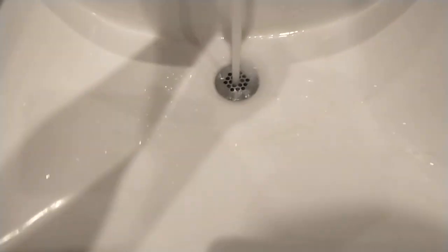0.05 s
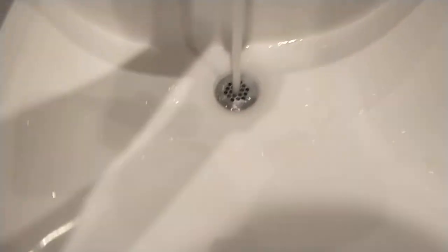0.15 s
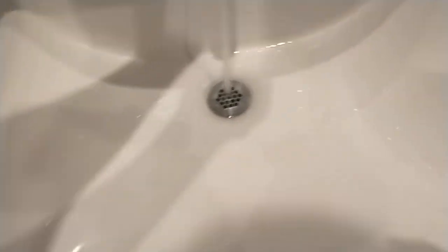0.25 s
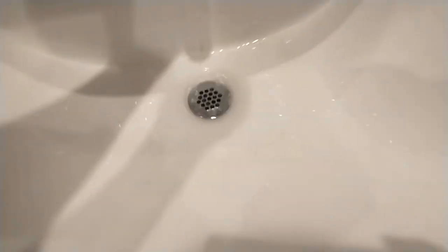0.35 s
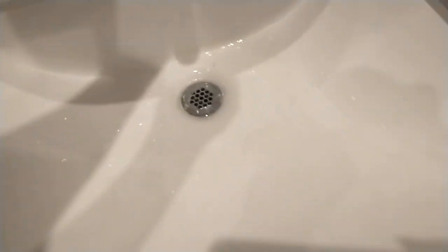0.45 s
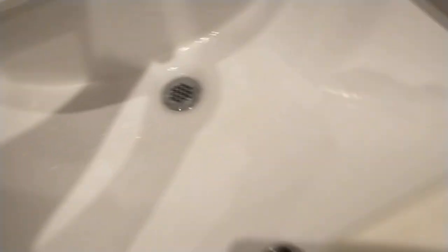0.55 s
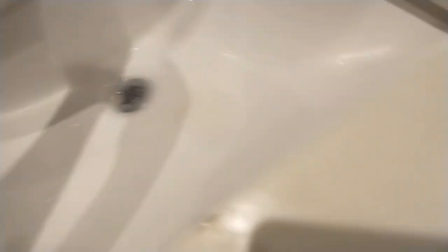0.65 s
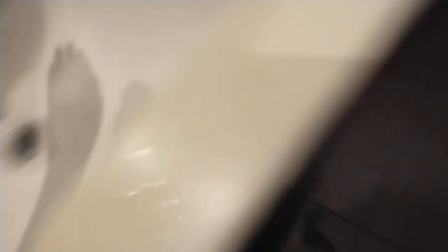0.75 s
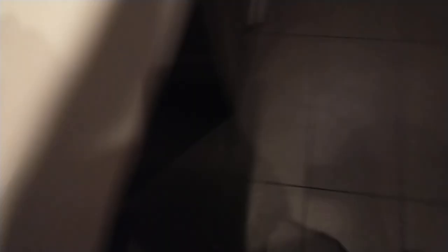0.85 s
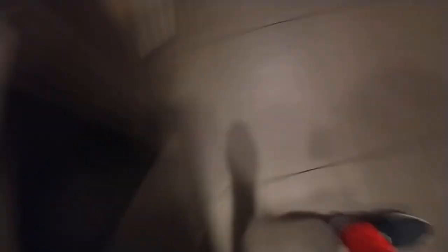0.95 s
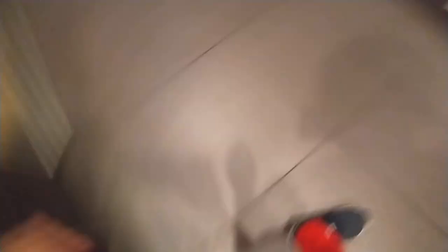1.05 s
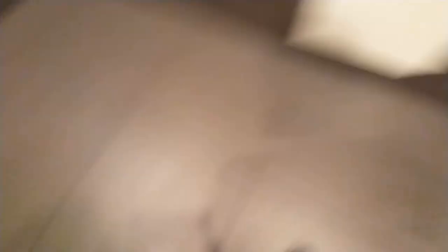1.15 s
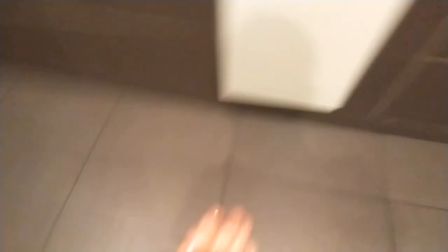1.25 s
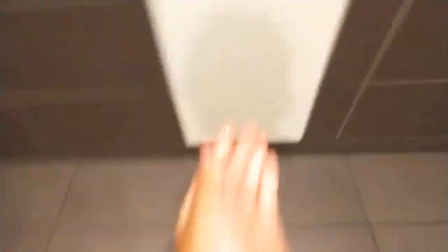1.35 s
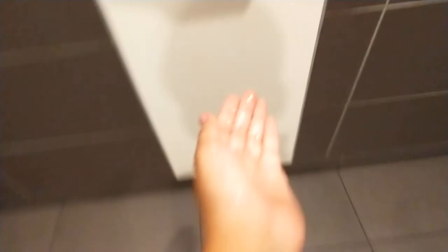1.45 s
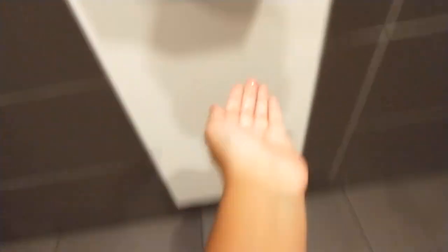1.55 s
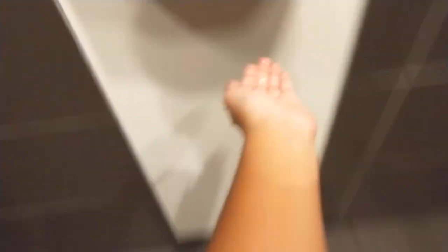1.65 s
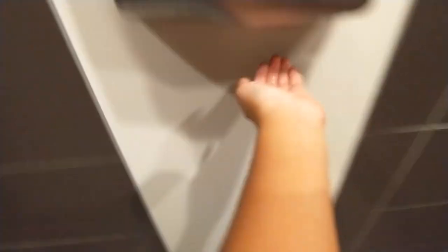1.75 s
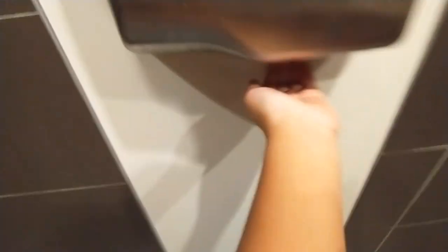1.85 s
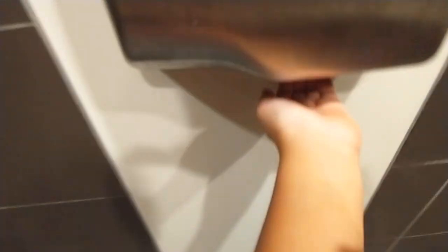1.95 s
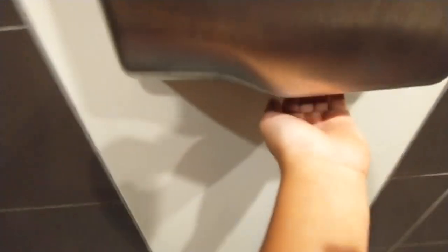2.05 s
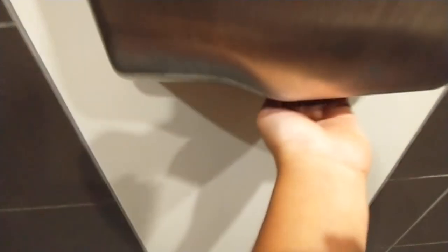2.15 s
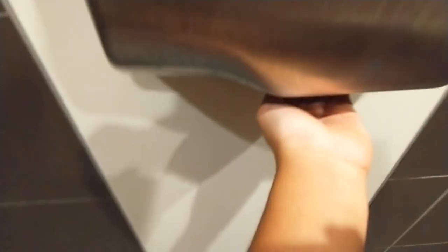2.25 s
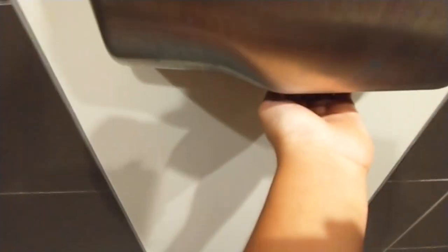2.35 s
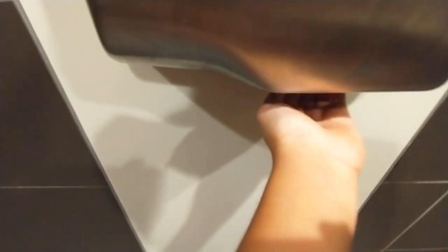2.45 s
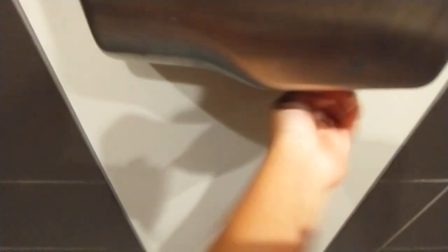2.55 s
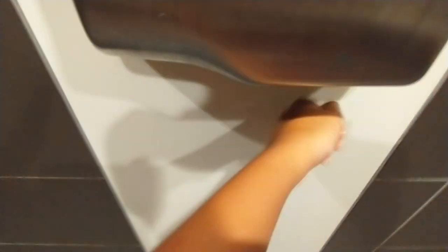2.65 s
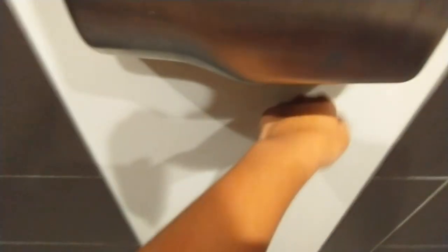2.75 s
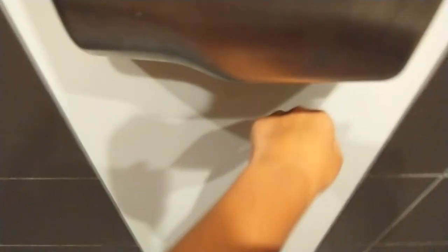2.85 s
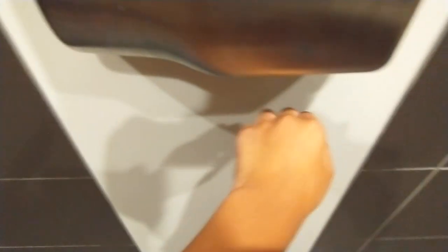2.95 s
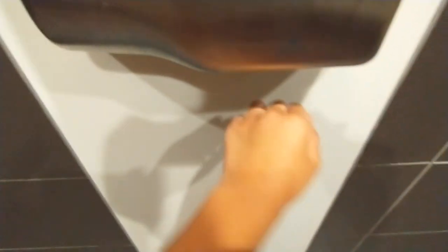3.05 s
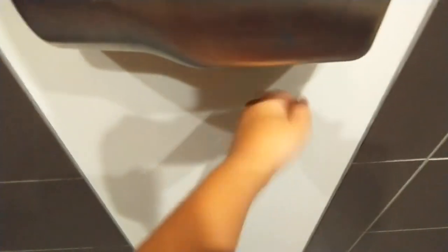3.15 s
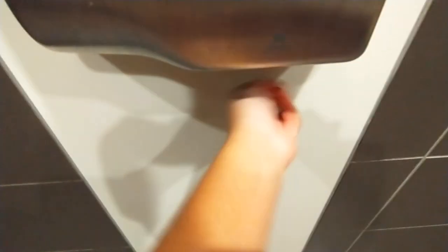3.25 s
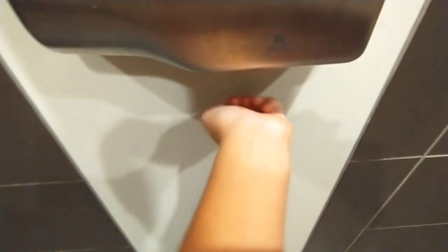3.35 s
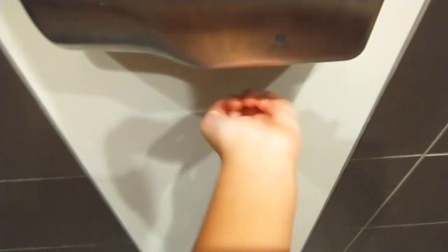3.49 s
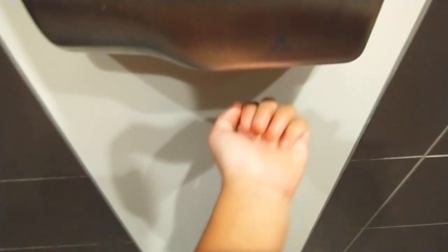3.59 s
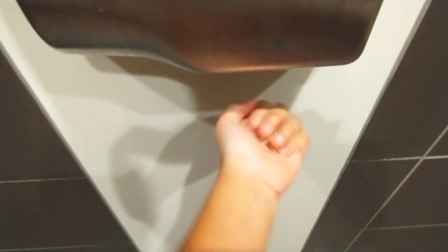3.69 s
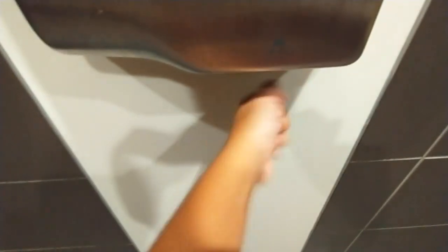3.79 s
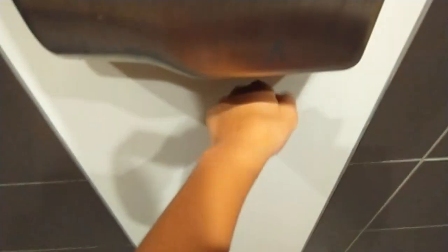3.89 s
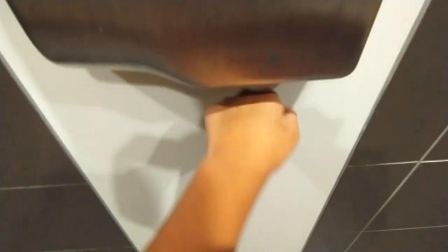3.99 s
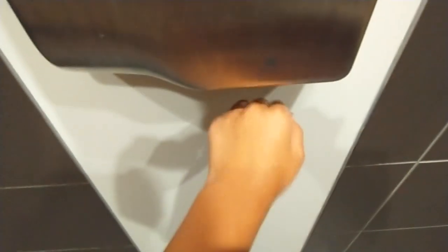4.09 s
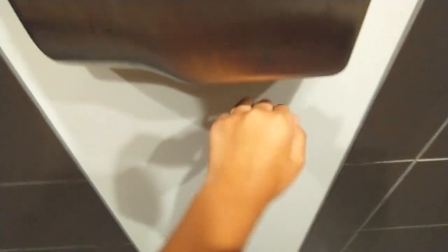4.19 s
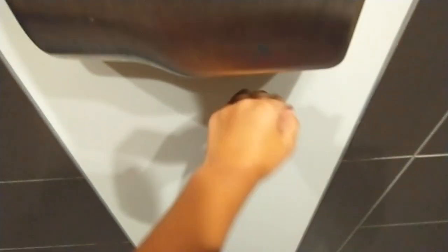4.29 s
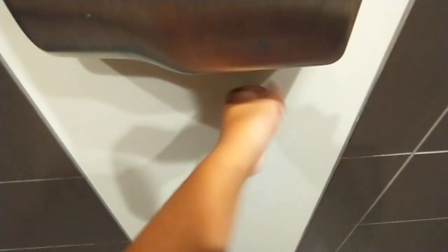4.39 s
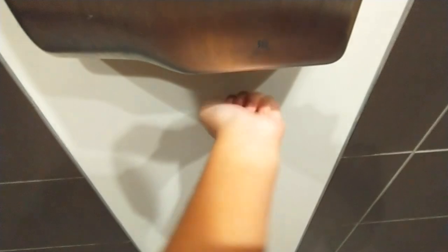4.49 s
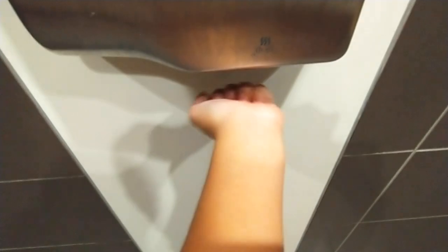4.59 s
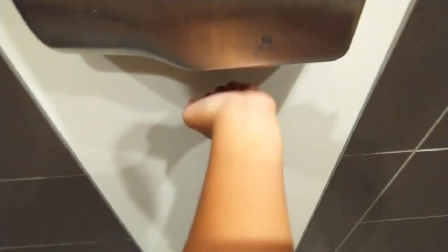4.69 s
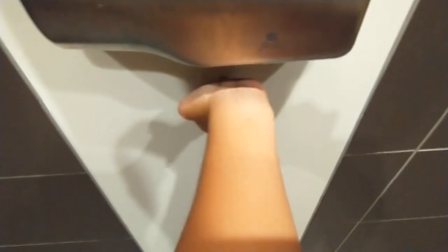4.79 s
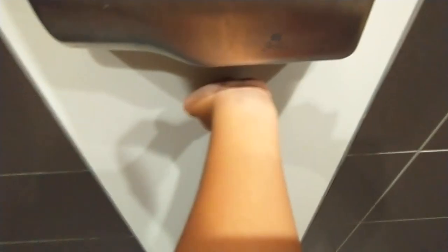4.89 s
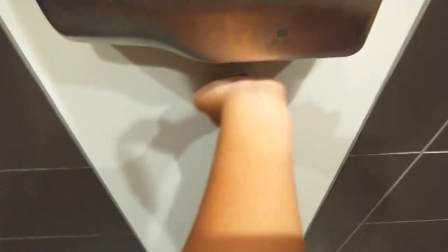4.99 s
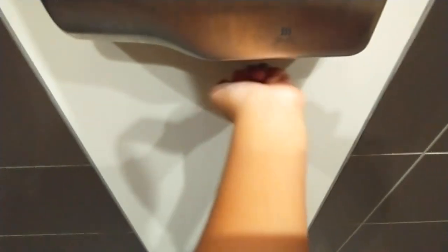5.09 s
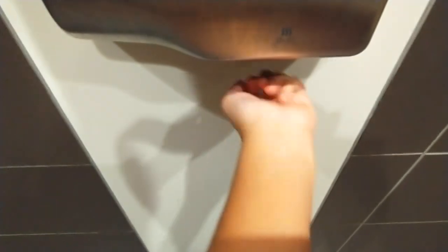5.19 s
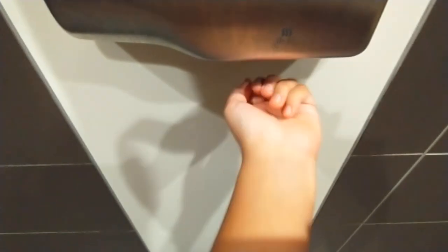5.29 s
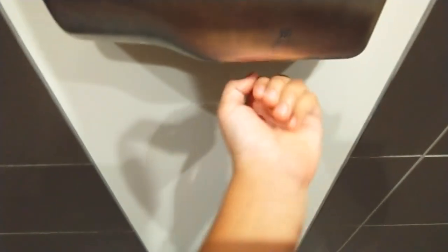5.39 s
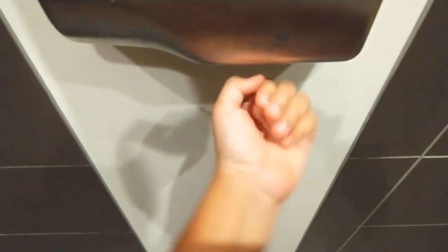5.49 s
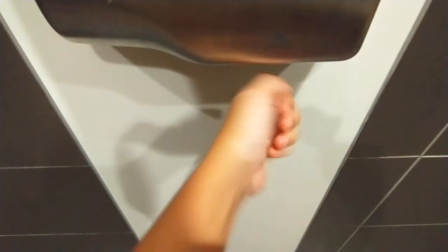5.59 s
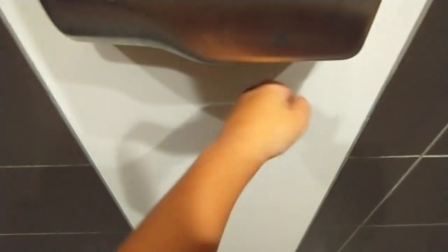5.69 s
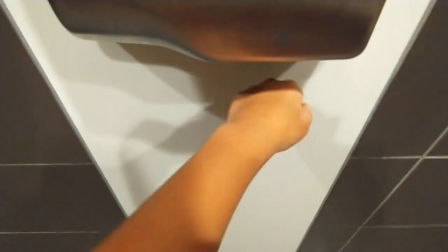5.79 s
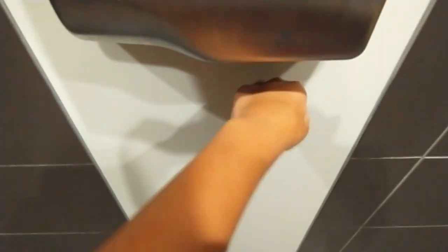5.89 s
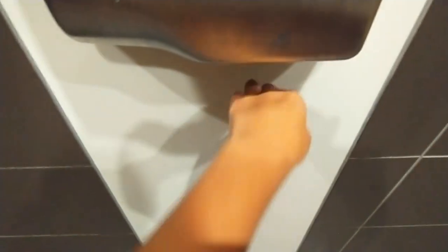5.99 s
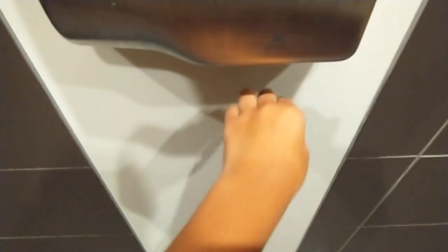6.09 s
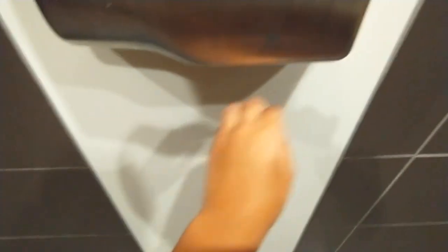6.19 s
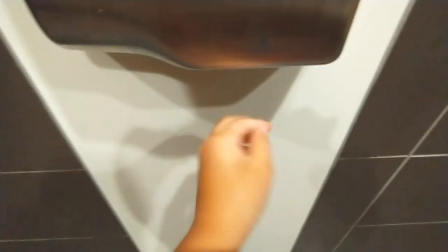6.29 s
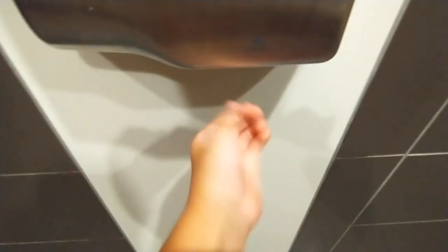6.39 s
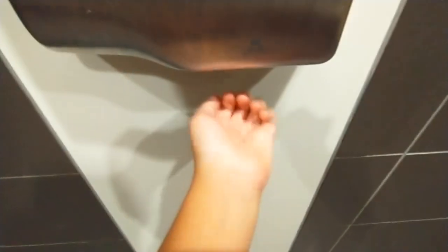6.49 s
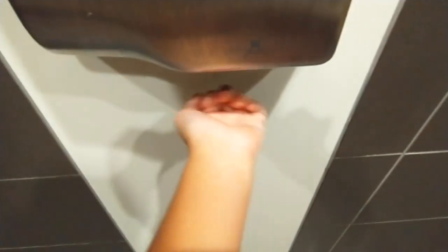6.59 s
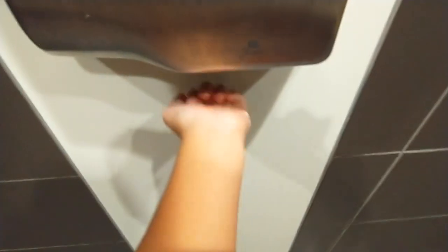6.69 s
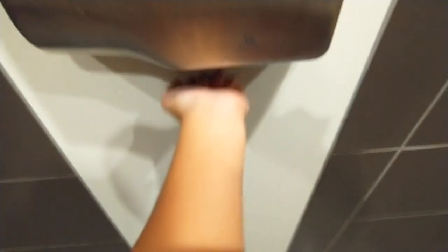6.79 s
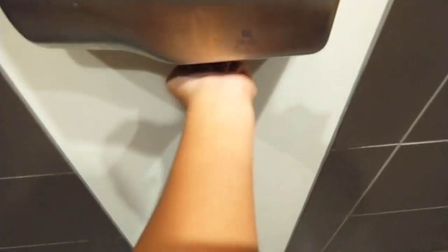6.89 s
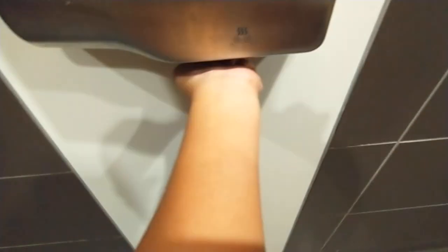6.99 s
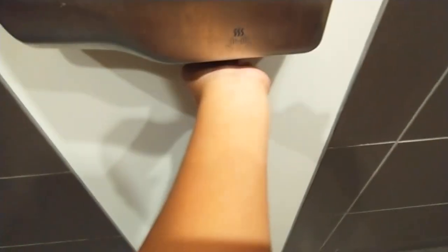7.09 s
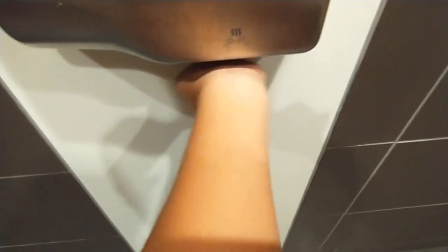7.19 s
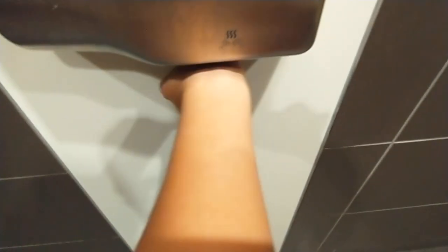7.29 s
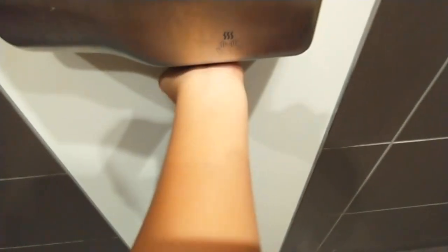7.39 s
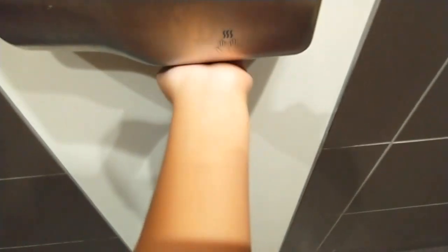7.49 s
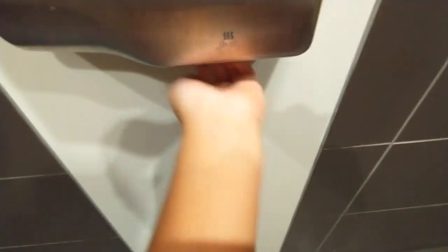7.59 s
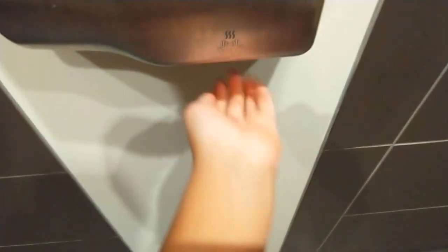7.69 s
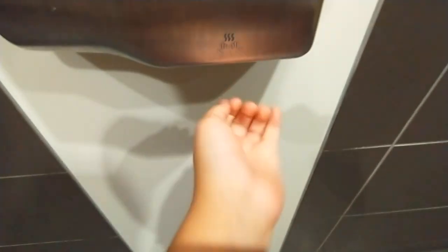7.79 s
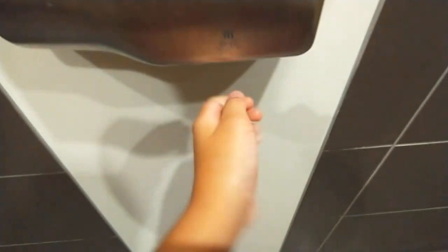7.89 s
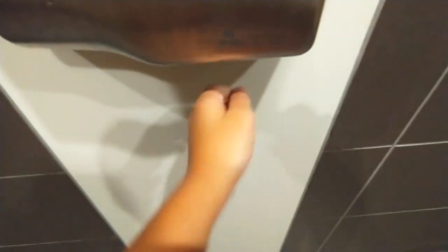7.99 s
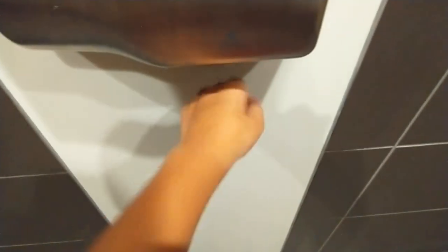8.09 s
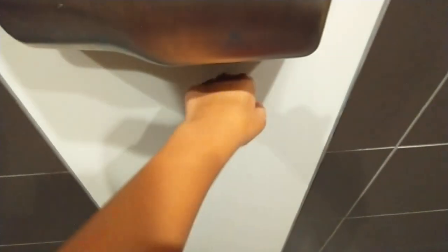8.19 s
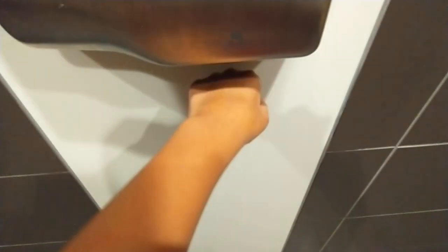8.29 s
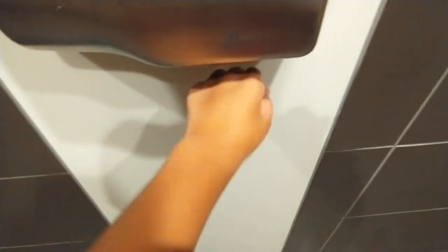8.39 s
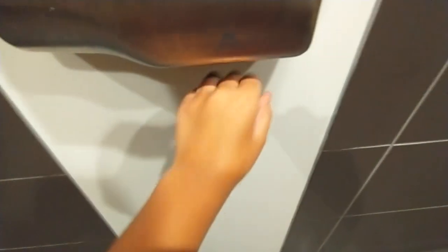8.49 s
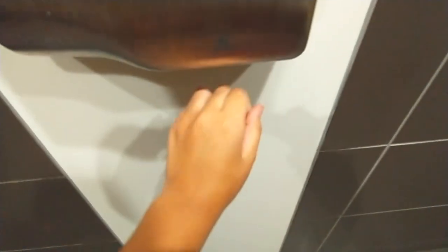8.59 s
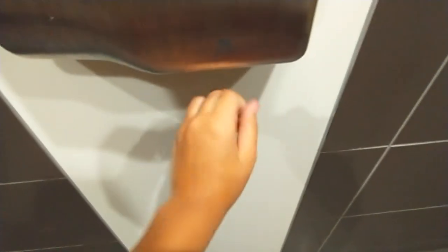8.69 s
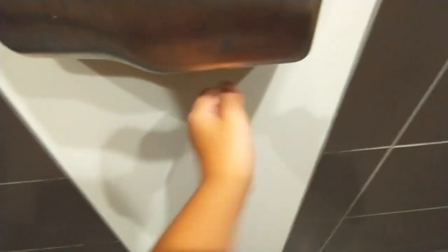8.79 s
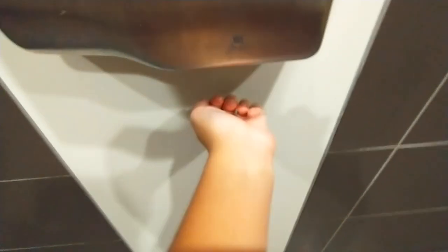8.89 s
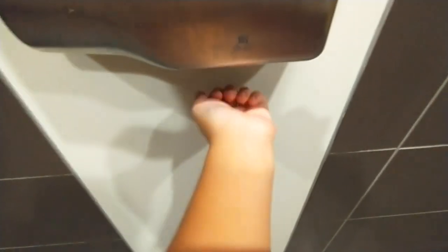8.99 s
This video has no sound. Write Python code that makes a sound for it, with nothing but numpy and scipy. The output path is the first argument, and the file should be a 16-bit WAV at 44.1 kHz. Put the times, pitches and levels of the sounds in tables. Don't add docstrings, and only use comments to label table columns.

```python
import sys
import numpy as np
from scipy import signal
from scipy.fft import rfft, irfft, next_fast_len
from scipy.io import wavfile
from scipy.ndimage import uniform_filter1d

SR = 44100
rng = np.random.default_rng(int(sys.argv[2]) if len(sys.argv) > 2 else 0)


def gain_from_decibels(decibels):
    exponent = np.asarray(decibels, float) / 20
    return 10 ** exponent


def put_to_file(sound):
    columns = np.atleast_2d(sound).T
    safe = np.clip(columns, -1, 1)
    whole_steps = np.round(safe * 32767)
    wavfile.write(sys.argv[1], SR, whole_steps.astype(np.int16))


N = 399105
SIZE, HOP = 1024, 256
HZ = np.fft.rfftfreq(SIZE, 1 / SR)
T = np.arange(N // HOP + 5) * HOP / SR
START_S, TOP_TURNS_PER_S = 2.404, 261.42

# f/Hz, level/dB per Hz
JET_SPECTRUM = [(20, -69), (60, -11.5), (110, -24.5), (200, -17.5), (330, -9), (700, -7.5), (950, -9),
                (1600, -8), (2300, -7.5), (3600, -5), (4400, -5.5), (5600, -7), (6400, -4.5), (8500, -14),
                (13500, -19), (15800, -28.5)]
# f/Hz, correlation/1
JET_SAME = [(60, .4), (130, 0.81), (290, 1), (690, 0.54), (1380, 0.35), (2070, 1), (2760, 0.44),
            (4100, 0.025), (5500, 0.12), (15000, 0.028)]
# f/Hz, left-right/dB
JET_SIDE = [(60, 9), (100, 6), (180, 6.5), (310, 3), (550, 3.5), (950, 6), (1650, 0), (2860, -1.5),
            (4970, -3.5), (8640, 10.5), (11500, -10.5), (15000, 0)]
# t/s, left-right/dB
JET_PAN = [(2.4, -13), (2.55, -12), (2.7, -5), (2.95, 0.5), (5.2, -0.5), (5.45, 0), (6.1, 0.5), (9.05, -1)]
JET_BANDS_HZ = [800, 2300, 4700, 10000]
JET_POWERS = [2.1, 2.4, 2.8, 3.3]
# f/Hz, width/Hz, level over the air/dB
HOUSING_MODES = [(120, 14, 8), (175, 9, 17), (222, 13, 18), (258, 22, 11), (365, 12, 5), (398, 14, 9),
                 (507, 20, 7), (560, 25, 3), (635, 16, 7), (860, 40, -1), (1000, 25, 4), (1160, 50, 6.5),
                 (1300, 30, 5), (1455, 25, 4), (1980, 160, 3), (2570, 90, 1.5), (2850, 100, 4),
                 (5100, 300, 2.5), (15500, 500, 4)]
# t/s, length/s, f/Hz, level/dB
JET_COLOURS = [(2.596, 0.26, 1770, 9.5), (2.64, 0.26, 3600, 6.5), (2.77, 0.53, 570, 4.5),
               (3.7, 0.23, 4200, 0.5), (4.34, 0.12, 4600, -1.5), (4.592, 0.14, 1140, 4),
               (5.46, 0.65, 450, -3.5), (5.462, 0.27, 2760, 3.5), (5.5, 0.31, 11000, 0.5),
               (6.1, 0.23, 560, 2), (6.168, 0.13, 4000, 2), (6.5, 0.53, 8700, 1.5), (6.3, .4, 2550, 1),
               (6.9, 0.1, 3800, -4), (7.27, 0.76, 460, -2.5), (7.22, 0.94, 4820, 0),
               (7.35, 0.52, 4000, -0.5), (7.27, 1, 2100, -2), (7.15, 0.22, 8500, 2),
               (6.9, 0.16, 10000, -3.5), (7.5, 0.16, 950, 0.5), (7.82, 0.1, 1700, 3),
               (7.82, 0.092, 1900, -5), (8.803, 0.53, 4600, -0.5), (8.26, 0.57, 3700, -2),
               (8.4, 0.13, 4800, 1), (2.72, .2, 11000, 5), (2.72, 0.4, 220, 8), (2.5, 0.2, 1700, -1.5),
               (2.47, 0.12, 6300, -6.5), (2.5, .14, 4800, -5), (2.6, .1, 5900, 2), (3.71, .3, 3500, 1.5),
               (4.65, 0.3, 1600, -2.5), (5.9, 0.37, 2100, 0), (6.2, 0.92, 1200, 2), (5.57, 0.18, 2900, -0.5),
               (6, 0.19, 230, 4.5), (6.98, 0.18, 1400, 1), (8.497, 0.16, 295, 5), (4.15, 0.4, 2600, 0.5),
               (7.583, 0.068, 2700, -4.5), (2.8, 0.36, 13000, -2.5), (8.597, .8, 1600, 0.5),
               (4.93, 0.32, 1000, 3), (5.5, .15, 1900, -3), (7.5, 0.22, 2800, -1), (2.3, .12, 11000, 2),
               (2.8, 0.44, 4700, 0), (3.75, 0.18, 2100, 0.5), (5.9, 0.17, 1100, 1), (7.85, 0.18, 4000, -1.5),
               (7.15, .3, 1700, 0.5), (5.4, .2, 1800, 1), (8.85, .25, 1500, -0.5)]
# t/s, f/Hz, level over the air/dB
NOZZLE_HISS = [(2.55, 4770, 6.5), (2.9, 4760, 5), (3.33, 4900, 2), (3.87, 4580, 4.5), (4.06, 5000, 0.5),
               (4.27, 4380, 4.5), (4.46, 4870, 3), (4.7, 4400, 4), (5.04, 5200, 3), (5.2, 4370, 3.5),
               (5.5, 4800, 3), (6.0, 4800, 2), (6.15, 4400, 4), (6.4, 4850, 3.5), (6.86, 4930, 2.5),
               (7.05, 5000, 5.5), (7.6, 4740, 3.5), (9.05, 4800, 4)]

# speed/turns per s, time constant/s
SPIN_UP = [
    (109.1, .1416),
    (108.5, .2876),
]
# f/Hz, level/dB
WHINE_LEFT = [(2000, -52), (3300, -42), (3950, -30), (4550, -38), (5300, -30), (5750, -22), (6080, -17),
              (6230, -24.5)]
# f/Hz, level/dB
WHINE_RIGHT = [(1900, -52), (2200, -46), (2550, -33), (2950, -35), (3350, -21), (3600, -25), (3900, -16),
               (4300, -22), (4600, -20), (4900, -16), (5250, -23), (5650, -17), (6230, -34)]
# t/s, length/s, level/dB, port/0 left 1 right
HAND_SHADES = [(4.11, .09, -13, 0), (4.27, .15, 4, 0), (4.95, .1, -8, 0), (5.3, .15, 4, 0),
               (5.72, .2, 5, 0), (6.08, .26, -11, 0), (6.28, .12, 7, 0), (6.72, .06, -8, 0),
               (6.83, .11, 7, 0), (6.98, .14, -8, 0), (7.41, .2, 7.5, 0), (7.74, .36, -10, 0),
               (7.98, .08, 5, 0), (8.24, .07, -6, 0), (8.62, .15, 6, 0), (8.84, .2, -18, 0),
               (3.3, .2, -4, 0), (2.74, .06, -9, 1), (3.5, .12, 6, 1), (4.4, .2, -6, 1), (4.85, .3, 6, 1),
               (5.5, .25, 4, 1), (6.2, .15, -12, 1), (6.8, .25, 7, 1), (7.5, .5, -4, 1), (7.97, .1, 5, 1),
               (8.75, .45, -8, 1)]
# f/Hz, t60/s, level/dB
CASING_MODES = [(1950, .2, 20), (2570, .3, 29), (3400, .25, 9), (4720, .3, 6)]
# t/s, level/dB
SHAFT_TONE = [(2.45, -42), (2.6, -35), (2.75, -27), (2.95, -26), (3.4, -29), (3.7, -31.5), (9.05, -31.5)]
# multiple/1, left level/dB, right level/dB
SHAFT_ORDERS = [(4, -39, -45), (16, -52, -44), (20, -38, -37), (28, -39, -50), (44, -58, -48),
                (48, -54, -53)]
# t/s, level/dB
HUM = [
    (2.404, -55),
    (2.43, -36),
    (2.48, -28.5),
    (2.52, -36),
    (2.7, -45.5),
    (9.05, -50),
]
# t/s, peak level/dB
RELAY = [
    (2.4035, -27),
]
# f/Hz, level/dB, t60/s
RELAY_MODES = [(2400, -6, .04), (3600, -6, .04), (4330, -4, .05), (6500, -10, .03), (10050, 4, .02)]

# t/s, level/dB, length/s, port/0 left 1 right
GUSTS = [(2.526, -25, 0.15, 1), (3.66, -30, 0.05, 1), (3.762, -34, 0.092, 0), (5.006, -39, 0.061, 0),
         (5.376, -47, 0.06, 1), (5.435, -38, 0.057, 0), (5.574, -38, 0.055, 0), (6.685, -28.5, 0.032, 0),
         (7.791, -21.5, 0.083, 0), (7.853, -30, 0.052, 1), (7.925, -41, .08, 0), (8.553, -48, 0.1, 0),
         (0.581, -58, 0.078, 1), (4.2, -45, 0.055, 1)]
# f/Hz, level/dB per Hz
GUST_SPECTRUM = [(15, -36), (35, -28), (60, -13.5), (100, 8.5), (180, 3.5), (300, -2), (600, -26),
                 (1200, -42)]

# t/s, level below full/dB
FLOW = [
    (0, 1),
    (.3, -0.5),
    (.4, -2.5),
    (.48, -5.5),
    (.54, -9),
    (.62, -21.5),
    (.72, -30),
    (.82, -40),
]
# f/Hz, level/dB per Hz
SPLASH_SPECTRUM = [(290, -40), (500, -10), (561, -3), (738, -17), (1460, -9.5), (2000, -2.5), (2520, -8),
                   (2750, -0.5), (3040, -1), (5180, 5.5), (8970, -6.5), (12700, -3), (15800, -11)]
# f/Hz, correlation/1
SPLASH_SAME = [(60, 0.95), (180, 1), (550, 0.93), (1650, 0.12), (4970, 0.02), (15000, 0.05)]
# f/Hz, left-right/dB
SPLASH_SIDE = [(60, 1), (180, -2), (550, 2), (1650, -5), (4970, -4.5), (15000, -9.5)]
# t/s, length/s, f/Hz, level/dB
THINNING = [(.36, .08, 3000, -4), (.34, .1, 14000, -5), (.45, .08, 7000, -3), (.37, .03, 7500, -2.5),
            (.42, .06, 5400, 3.5), (.2, .12, 12500, 2)]
# f/Hz, width/Hz, level/dB
BASIN_MODES = [(110, 40, -12), (226, 16, -9), (258, 16, -5), (322, 18, 5), (350, 20, -3), (403, 20, -4),
               (740, 70, -11), (830, 50, -16), (1000, 80, -17), (1200, 60, -18), (1950, 150, -19)]
# t/s, length/s, level/dB
SLUGS = [(0.025, 0.014, 2.5), (.06, .015, 2), (0.094, .025, 3), (.142, .012, 7.5), (.182, .015, 3),
         (.215, .03, 4), (0.288, .02, 4)]
# f/Hz, width/Hz, level/dB
DRAIN_MODES = [(85, 40, 0), (170, 30, -6), (250, 24, 2), (290, 20, -3), (410, 24, 1), (1060, 40, -13)]
# t/s, length/s, level/dB
GULPS = [
    (0.302, .02, -40),
    (0.331, 0.04, -27),
    (0.354, 0.025, -29),
    (.385, 0.049, -30),
    (0.422, 0.022, -31),
    (.46, .04, -42),
]
# t/s, peak level/dB, f/Hz, left-right/dB
DROPS = [(0.0333, -16, 10800, -13), (.05, -20, 11500, -8), (.075, -20, 9000, -9), (.093, -16, 10000, -8),
         (0.1286, -22, 11100, -5), (0.1461, -14, 10600, -13), (.164, -19, 10000, -10),
         (.181, -18, 12500, -9), (0.188, -16, 4400, -12), (0.2044, -15, 11000, -10),
         (.219, -14, 11000, -11), (.224, -20, 5300, -8), (0.2448, -17, 12000, -12), (.262, -19, 13500, -10),
         (.284, -19, 5300, -8), (.306, -19.5, 10500, -7), (0.3192, -20, 9300, -7), (.321, -22, 5600, -2),
         (.338, -23, 11500, -7), (.356, -22, 13000, -5), (0.387, -10, 5650, -3.5), (.391, -19.5, 9500, -5),
         (0.403, -20, 8800, -5.5), (0.42, -23, 12500, -7), (.433, -22, 4900, -5), (.455, -24, 12800, -6),
         (0.467, -23, 12100, -4), (.472, -24, 3900, -6), (0.4895, -19, 10400, -4), (0.508, -26, 9500, -8)]
# t/s, peak level/dB
VALVE = [
    (0.488, -5.5),
]
# f/Hz, level/dB, t60/s
VALVE_MODES = [(500, -4, .04), (720, -9, .04), (1080, -12, .045), (1200, -8, .055), (1370, -11, .03),
               (1830, -5, .03), (1970, 0, .03)]

# t/s, rustle/dB, thud/dB, bright swish/dB
MOVES = [
    (.66, -75, -51.5, -80),
    (.79, -72, -64, -79),
    (1.0, -77, -57, -76.5),
    (1.18, -56.5, -55, -73),
    (1.3, -56.5, -71, -64),
    (1.78, -62.5, -54, -77.5),
    (1.88, -66, -66, -76),
]
# f/Hz, level/dB per Hz
RUSTLE_SPECTRUM = [(290, -45), (500, -16.5), (612, -14), (1060, -9), (2630, -6.5), (3560, -7.5), (5180, -4),
                   (11600, -10), (15800, -13)]
# f/Hz, level/dB per Hz
RUMBLE_SPECTRUM = [(20, -19), (45, -12), (90, 4.5), (125, -5), (200, -4.5), (370, -11.5), (630, -12.5),
                   (1000, -24), (2000, -54)]
# f/Hz, correlation/1
QUIET_SAME = [(60, 0.86), (240, 0.97), (950, -0.038), (3770, 0.064), (15000, -0.01)]
# f/Hz, left-right/dB
QUIET_SIDE = [(60, -4), (240, -1.5), (950, -1), (3770, -7.5), (15000, -1)]
# f/Hz, width/Hz, level/dB
FLOOR_MODES = [(125, 12, 7.5), (182, 14, -1), (280, 13, 5.5), (380, 20, 7), (510, 18, 7.5), (640, 14.2, 4)]
# t/s, length/s, level/dB
PIPE_WHISTLE = [(.8, .3, -80), (1.4, 0.5, -87), (1.7, .35, -86), (2.0, 0.35, -80.5)]


def jet():
    speed_db = np.outer(JET_POWERS, 20 * np.log10(shaft_speed(T) / TOP_TURNS_PER_S))
    weights = [np.interp(np.log(HZ + 1), np.log(JET_BANDS_HZ), row) for row in np.eye(len(speed_db))]
    speed_db = np.array(weights).T @ speed_db
    octave = np.log2(HZ + 1)[:, None]
    colour_db = 0
    for s, length, hz, db in JET_COLOURS:
        colour_db = colour_db + db * bump(T, s, length) * bump(octave, np.log2(hz), 1)
    nozzle_hz, nozzle_db = curves(NOZZLE_HISS, T)
    colour_db += nozzle_db * bump(octave, np.log2(nozzle_hz), 0.3)
    level_db = -21 + 2.5
    field_db = band_rms(read(JET_SPECTRUM), 300, 1523) + level_db + colour_db + speed_db
    side_db = read(JET_SIDE) + curves(JET_PAN, T)[0] * np.clip(HZ[:, None] / 1500, 0, 1)
    air = noise(field_db, JET_SAME, side_db, 1.05, .45, bins=10, frames=35, lag_s=9e-5)
    ripple = evened(uniform_filter1d(rng.standard_normal(SR // 20), size=3))

    def enclosure(f):
        ripple_db = 1.3 * np.interp(f / 10, np.arange(len(ripple)), ripple) * (f > 700) / (1 + f / 2500)
        bass_cut = 1 + (58 / (f + 1)) ** 4
        return np.sqrt(1 + peaks(HOUSING_MODES, f)[:, 0]) * gain_from_decibels(ripple_db) / bass_cut

    return coloured(air, enclosure) * gate(START_S, 99, 0.01)


def motor():
    t = np.arange(N) / SR
    speed = shaft_speed(t)
    angle = 2 * np.pi * np.cumsum(speed) / SR
    whine_db = np.array([read(port, 24 * speed[::HOP])[:, 0] for port in (WHINE_LEFT, WHINE_RIGHT)])
    for s, length, db, port in HAND_SHADES:
        whine_db[int(port)] += db * bump(t[::HOP], s, length)
    whine_db = np.array([np.interp(t, t[::HOP], row) for row in whine_db])
    whine = gain_from_decibels(whine_db) * np.sin(24 * angle + np.array([[0], [.6]]))
    whine = whine * gate(2.43, 99, .06) * gain_from_decibels(wavering(1.5, 2 * t % 9))
    out = tiles(whine + rings(whine, CASING_MODES), -11, .4)
    shaft_db = curves(SHAFT_TONE, t)[0] + wavering(2.0, t)[0] + np.array([[1.2], [-1.2]])
    out += gain_from_decibels(shaft_db) * np.sin(angle)
    spin_db = 60 * np.log10(speed / speed[-1])
    for multiple, *port_db in SHAFT_ORDERS:
        level_db = np.array(port_db)[:, None] + spin_db + wavering(4.5, t)
        out += gain_from_decibels(level_db) * np.sin(multiple * angle + 2 * np.pi * rng.random((2, 1)))
    hum = 2 * np.pi * 118.6 * t
    hum_wave = np.sin(hum) + .35 * np.sin(2 * hum + 1.5) + .2 * np.sin(3 * hum)
    out += gain_from_decibels(curves(HUM, t)[0] + (t > 2.7) * wavering(4.0, t)) * hum_wave
    click = coloured(knock(RELAY[0], RELAY_MODES, 0.61, 0.0033), lambda f: 1 / (1 + (f / 13500) ** 8))
    return np.sqrt(2) * out * gate(START_S, 99, 0.012) + tiles(click, -3, 0.4)


def shaft_speed(t):
    to_gain = sum(turns * np.exp(-np.maximum(t - START_S, 0) / tau) for turns, tau in SPIN_UP)
    blocked_s, rush_turns_per_s, unload_s, reload_s = 7.58, 6.4, .06, .38
    late = t - blocked_s
    rush = 1 / (np.exp(-late / unload_s) + np.exp((late / reload_s).clip(0) ** 1.5))
    return TOP_TURNS_PER_S - to_gain + rush_turns_per_s * rush


def gusts():
    level = np.zeros((2, N))
    for s, db, length, port in GUSTS:
        level[int(port)] += gain_from_decibels(db) * gate(s - .01, s + length + 0.05, 0.035)
    field_db = band_rms(read(GUST_SPECTRUM), 30, 110) + 2.7 + 0 * T
    unrelated = [(1, 0), (2, 0.0041)]
    return level * noise(field_db, unrelated, 0 * HZ[:, None], 2.4, 1.6, bins=3, frames=3, size=48)


def faucet():
    flow_db = curves(FLOW, T)[0]
    side_db = read(SPLASH_SIDE)
    push_points = [(30, -27.5), (80, -4.5), (1500, -4.5), (4000, -22)]  # f/Hz, level/dB per Hz
    push_db = band_rms(read(push_points), 100, 670) + 10.3 + 0 * T
    water = splash(flow_db, side_db) + basin(push_db, flow_db, side_db) + drain(push_db, side_db) + drops()
    return water * gate(-1, .82, .12) + valve()


def splash(flow_db, side_db):
    hz = HZ[:, None]
    spray_db = np.clip((hz - 6000) / 3000, 0, 1) * 6 + (hz / 11000) ** 2 * flow_db
    for s, length, centre_hz, db in THINNING:
        spray_db += db * bump(T, s, length) * bump(np.log2(hz / centre_hz + .01), 0, .7)
    level_db = -28 + 6.0
    field_db = band_rms(read(SPLASH_SPECTRUM), 2000, 8700) + level_db + flow_db + spray_db
    hiss = noise(field_db, SPLASH_SAME, side_db, 2.7, 1.2, frames=3, count=170)
    sputter = evened(uniform_filter1d(uniform_filter1d(rng.standard_normal(N), size=150), size=100))
    return hiss * gain_from_decibels(1.7 * sputter - 1)


def basin(push_db, flow_db, side_db):
    field_db = push_db - 33 + 0.94 * flow_db
    stream = noise(field_db, SPLASH_SAME, side_db, 0.89, 1.5, bins=3, frames=4, count=170)
    t = np.arange(N) / SR
    stream *= gain_from_decibels(sum(db * bump(t, s, length) for s, length, db in SLUGS))
    return coloured(stream, lambda f: np.sqrt(peaks(BASIN_MODES, f)[:, 0]))


def drain(push_db, side_db):
    t = np.arange(N) / SR
    level = sum(gain_from_decibels(db) * bump(t, s, length) for s, length, db in GULPS)
    gulps = noise(push_db, SPLASH_SAME, side_db, .6, .6, count=170) * level
    return coloured(gulps, lambda f: np.sqrt(peaks(DRAIN_MODES, f)[:, 0]))


def drops():
    out = np.zeros((2, N))
    t = np.arange(300) / SR
    ring_cycles = 9
    for s, db, hz, pan_db in DROPS:
        chance = uniform_filter1d(rng.standard_normal(len(t)), size=9)
        cycles = np.cumsum(hz * (1 + .5 * chance)) / SR
        decay = gain_from_decibels(db + 2 - 24 * t * hz / ring_cycles)
        grain = np.sin(2 * np.pi * cycles) * decay * np.minimum(t / .0005, 1)
        at = round(s * SR)
        out[:, at:at + len(t)] += grain * gain_from_decibels(np.array([[pan_db / 2], [-pan_db / 2]]))
    return out


def valve():
    blow = knock(VALVE[0], VALVE_MODES, .04, .003)
    return tiles(coloured(blow, lambda f: 1 / (1 + (f / 4500) ** 2)), -1, .5)


def quiet_room():
    s, *peak_db = np.transpose(MOVES)[:, :, None]
    shape_db = np.minimum(129 * (T - s), 54 * (s - T))
    trickle_db = -58 - 9 * T
    floors_db = [trickle_db, -60.5, trickle_db - 16]
    levels_db = []
    for peak, floor in zip(peak_db, floors_db):
        power = gain_from_decibels(2 * floor) + gain_from_decibels(2 * (peak + shape_db)).sum(axis=0)
        levels_db.append(10 * np.log10(power))
    rustle_db, rumble_db, swish_db = levels_db
    side_db = read(QUIET_SIDE)
    bright_db = np.clip((HZ[:, None] - 5500) / 1500, 0, 1) * (swish_db - rustle_db + 4.0)
    field_db = band_rms(read(RUSTLE_SPECTRUM), 1000, 6300) + rustle_db + bright_db + 8.0
    rustle = noise(field_db, QUIET_SAME, side_db, 1.4, 0.75, frames=6, count=460)
    field_db = band_rms(read(RUMBLE_SPECTRUM), 40, 600) + rumble_db + 5.5
    rumble = noise(field_db, QUIET_SAME, side_db, 2.5, 1.2, bins=3, frames=8, count=460, size=64)
    rumble = coloured(rumble, lambda f: .6 * np.sqrt(1 + peaks(FLOOR_MODES, f)[:, 0]))
    t = np.arange(N) / SR
    level = sum(gain_from_decibels(db) * gate(s, s + length, .05) for s, length, db in PIPE_WHISTLE)
    whistle = level * gain_from_decibels(wavering(2.5, t)) * np.sin(2 * np.pi * 1305 * t)
    return (rustle + rumble) * gate(0.44, 3.0, 0.13) + whistle


def tiles(x, wet_db, t60):
    t = np.arange(SR // 2) / SR
    tail = rng.standard_normal((2, len(t))) * gain_from_decibels(-60 * t / t60) * (t > .004)
    return x + gain_from_decibels(wet_db) * signal.fftconvolve(x, tail / np.linalg.norm(tail[0]), axes=1)[:, :N]


def knock(event, modes, crack, attack_s):
    at_s, peak_db = event
    t, out = np.arange(6000) / SR, np.zeros((2, N))
    ring = 0
    phase = rng.random((2, 1)) * 0.54
    for hz, db, t60 in modes:
        ring = ring + gain_from_decibels(db - 60 * t / t60) * np.sin(2 * np.pi * (hz * t + phase))
        phase = rng.random((2, 1)) * 0.54
    ring = ring * (1 + 0.54 * rng.standard_normal((2, len(t)))) / len(modes) * 2
    ring = ring + crack * rng.standard_normal((2, len(t))) * gain_from_decibels(-60 * t / 0.089)
    at = round(at_s * SR)
    out[:, at:at + len(t)] = gain_from_decibels(peak_db) * ring * np.minimum(t / attack_s, 1)
    return out


def rings(x, modes):
    out = 0
    for hz, t60, db in modes:
        b, a = signal.iirpeak(hz, hz * t60 / 2.2, SR)
        out = out + gain_from_decibels(db) * signal.lfilter(b, a, x)
    return out


def noise(field_db, same, side_db, patchy_db, flicker_db, bins=12, frames=14, lag_s=0,
          count=len(T), size=len(HZ)):
    a, b, c, d, *patches = rng.standard_normal((count, size, 6), dtype=np.float32).T
    patches = uniform_filter1d(np.array(patches), round(bins), 1)
    patches = evened(uniform_filter1d(patches, round(frames), 2))
    flicker = evened(uniform_filter1d(rng.standard_normal((count, size)).T, size=200, axis=0))
    same = np.clip(read(same)[:size], -1, 1)
    left = a + 1j * b
    late = np.exp(-2j * np.pi * HZ[:size, None] * lag_s)
    right = same * late * left + np.sqrt(1 - same ** 2) * (c + 1j * d)
    tilt = gain_from_decibels(np.array([side_db / 2, -side_db / 2])[:, :size])
    tilt = tilt / np.sqrt(np.mean(tilt ** 2, axis=0))
    level_db = field_db[:size, :count] + patchy_db * patches + flicker_db * flicker
    z = np.zeros((2, len(HZ), count), complex)
    z[:, :size] = np.array([left, right])
    z[:, :size] *= tilt * gain_from_decibels(level_db)
    sound = 0.66 * signal.istft(z, nperseg=SIZE, noverlap=SIZE - HOP)[1][:, :N]
    return np.pad(sound, ((0, 0), (0, N - sound.shape[1])))


def wavering(depth_db, t):
    steps = evened(uniform_filter1d(rng.standard_normal((2, N // 2000 + 2)), size=3))
    return depth_db * np.array([np.interp(t * SR / 2000, np.arange(len(row)), row) for row in steps])


def coloured(x, gain):
    size = next_fast_len(N)
    return irfft(rfft(x, size) * gain(np.fft.rfftfreq(size, 1 / SR)), size)[:, :N]


def peaks(modes, f=HZ):
    return sum(gain_from_decibels(2 * db) / (1 + (2 * (f - hz) / width) ** 2) for hz, width, db in modes)[:, None]


def band_rms(shape_db, lo, hi):
    inside = (HZ >= lo) & (HZ < hi)
    return shape_db - 10 * np.log10(np.sum(gain_from_decibels(2 * shape_db[inside])))


def read(points, hz=HZ):
    f, value = np.transpose(points)
    return np.interp(np.log(hz + 1), np.log(f + 1), value)[:, None]


def curves(rows, t):
    s, *columns = np.transpose(rows)
    return [np.interp(t, s, c) for c in columns]


def gate(t0, t1, fade):
    t = np.arange(N) / SR
    return np.clip(np.minimum(t - t0, t1 - t) / fade, 0, 1)


def bump(x, centre, width):
    return np.exp(-(2 * (x - centre) / width) ** 2)


def evened(x):
    return x / np.sqrt(np.mean(x ** 2) + 1e-20)


def scene():
    return jet() + motor() + gusts() + faucet() + quiet_room()


def top_cut(x):
    return signal.sosfilt(signal.butter(12, 15900, fs=SR, output="sos"), x)


def record(dry):
    heard = signal.sosfilt(signal.butter(2, 46, "high", fs=SR, output="sos"), dry)
    return top_cut(np.clip(heard, -1, 1))


dry = scene()
out = record(dry)
put_to_file(out)
```